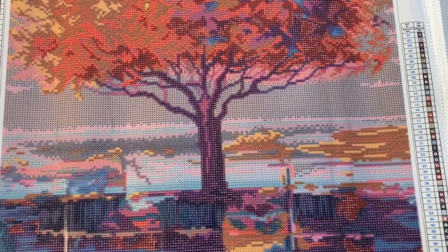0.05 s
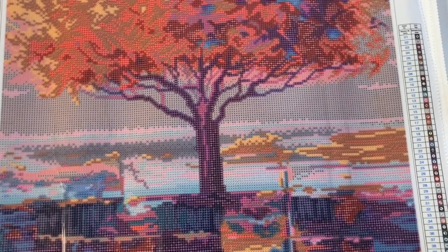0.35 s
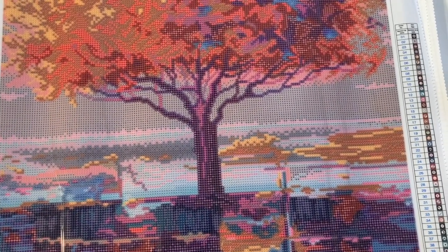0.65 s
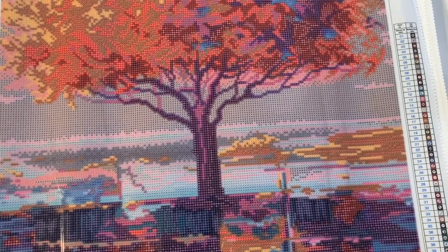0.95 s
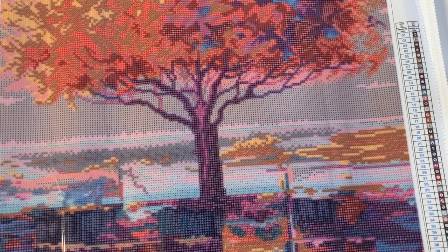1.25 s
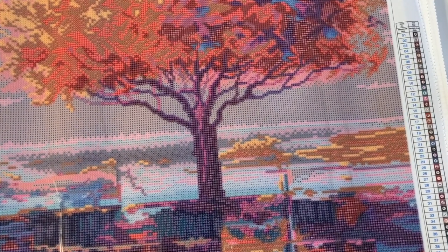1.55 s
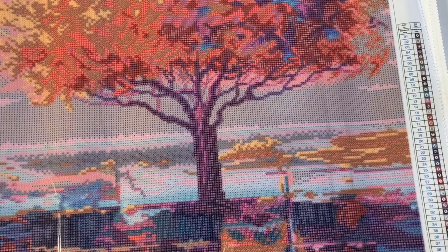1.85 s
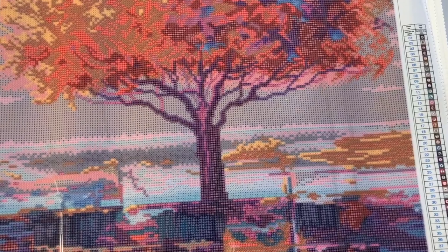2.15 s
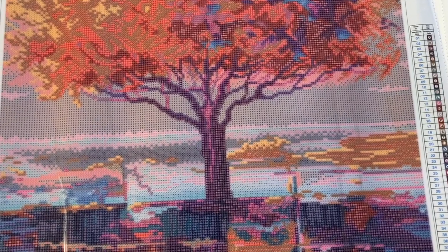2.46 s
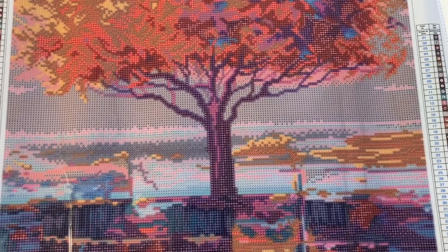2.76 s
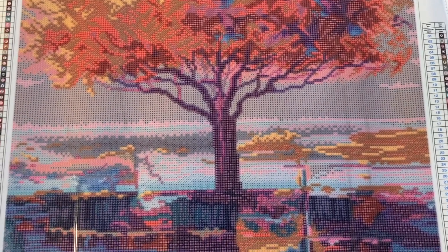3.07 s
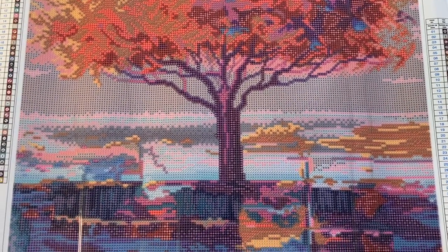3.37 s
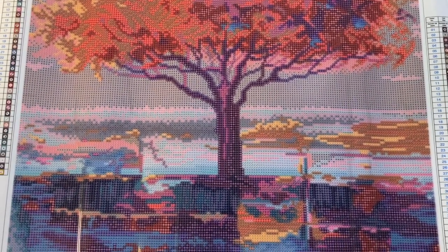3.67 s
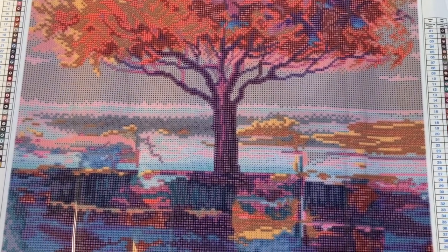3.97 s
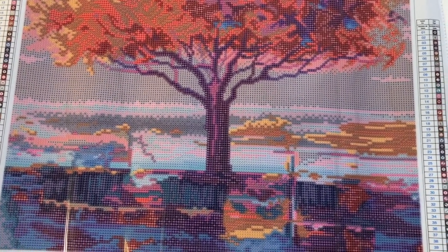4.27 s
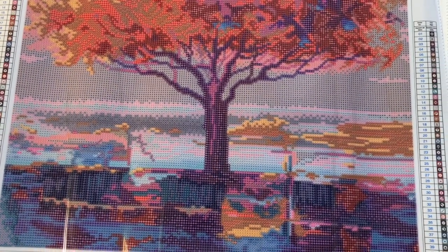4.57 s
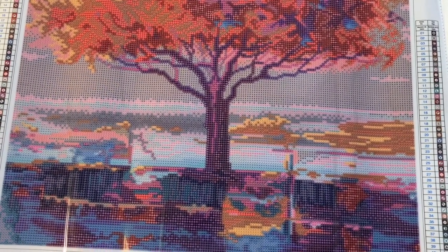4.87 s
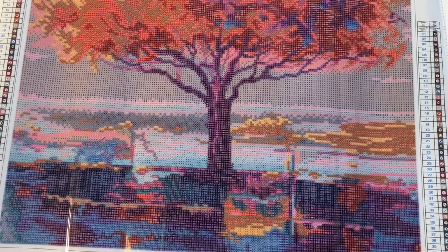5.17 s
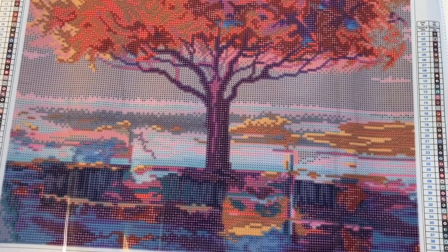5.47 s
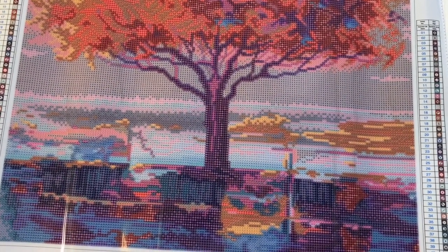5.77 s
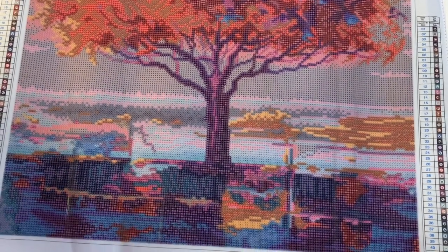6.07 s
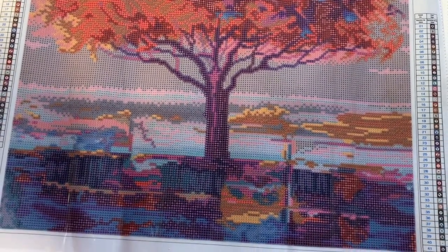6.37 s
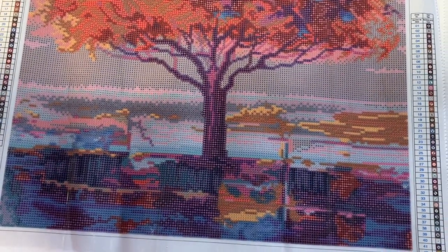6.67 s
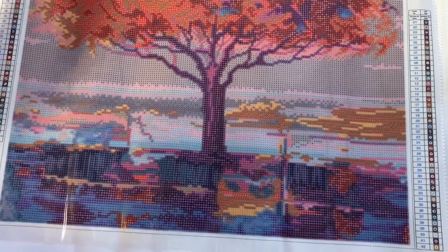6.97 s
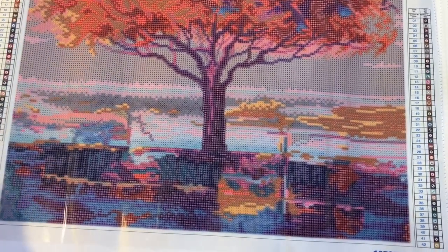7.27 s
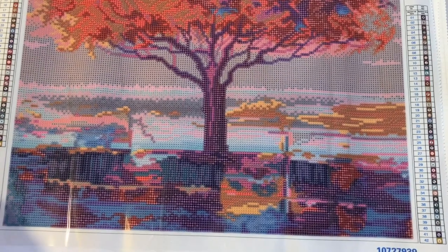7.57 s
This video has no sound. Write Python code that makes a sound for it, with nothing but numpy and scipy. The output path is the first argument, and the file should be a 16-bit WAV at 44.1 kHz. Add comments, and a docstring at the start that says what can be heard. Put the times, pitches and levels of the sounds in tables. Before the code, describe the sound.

In a small room with a faint machine hum, a stiff canvas covered in plastic film is handled right by a stereo microphone. The film crackles in irregular bursts, bright clicks jumping left and right over light pops of the bending sheet. After its busiest stretch the crinkling gives way to gentle sliding swishes and soft thuds on the table, and dies down to sparse ticks.

```python
"""Clear plastic film crackles on a canvas being shifted about a table, close to a small stereo microphone.
Creases at both edges snap singly and in dense swarms, while the stiff sheet flexes and flaps under them.
Towards the end it slides with a softer swish, and the hands bump the table now and then.
A machine hums in the small room."""
import sys
import numpy as np
from scipy import signal
from scipy.fft import rfft, irfft, next_fast_len
from scipy.io import wavfile
from scipy.ndimage import map_coordinates

SR = 44100
rng = np.random.default_rng(int(sys.argv[2]) if len(sys.argv) > 2 else 0)


def inscribe(sig):
    """Save sig as 16-bit PCM at rate SR to the path in sys.argv[1].

    A 1-D sig is mono; a 2-D sig holds one channel per row.
    Samples are clipped to [-1, 1] before scaling.
    """
    pcm = np.round(np.clip(np.atleast_2d(sig).T, -1, 1) * 32767)
    wavfile.write(sys.argv[1], SR, pcm.astype(np.int16))


N = 340452
TIME = np.arange(N) / SR
# how early the left microphone hears the right edge, the left edge and the sliding patch
RIGHT_MS, LEFT_MS, SLIDE_MS = -.272, .265, .41
# bright tone of tiny creases: (frequency [Hz], level [dB])
CREASE_TONE = [(150, -24), (400, -25), (800, -13.5), (1400, -6.5), (2200, -2.5), (3000, -3), (4000, -5),
               (5300, -4), (7200, 5.5), (8400, 3.5), (10300, -3), (12700, 2.5), (15500, -12.5)]


def film(right_db=1.33, left_db=0, swish_db=2.0, swish_rough_db=3):
    """The worked film snaps and crackles at both edges when it bends, and swishes when it slides."""
    # featured snaps: (time [s], energy [dB], tilt [dB/octave], length [ms], left microphone lead [ms])
    single_snaps = [(0.0157, -12.5, 4.5, 0.51, -0.29), (0.0301, -9, 8, 0.51, -0.42),
                    (0.0828, -5.5, 6.5, 0.64, -0.3), (0.0929, -3.5, 5, 1.5, -0.27),
                    (0.1316, -17.5, -1, 0.92, -0.32), (0.174, -14, -4, 0.71, -0.27),
                    (0.1949, -10, 4, 0.6, -0.18), (0.2404, -15, 8.5, 0.77, -0.2),
                    (0.2501, -15.5, 3.5, 0.65, -0.25), (0.3129, -26, -3, 0.94, -0.34),
                    (0.3352, -18, -1.5, 0.84, -0.27), (0.3839, -19.5, -5, 0.7, 0.3),
                    (0.4203, -9, 8, 0.6, -0.22), (0.4311, -10, 0.5, 0.78, -0.31),
                    (0.4464, -12.5, -1, 0.65, -0.15), (0.5008, -13.5, 3, 0.51, -0.21),
                    (0.5201, -6, 7, 0.64, -0.18), (0.5271, -8, 1, 1.1, -0.29),
                    (0.5336, -6.5, 5, 0.88, -0.24), (0.5422, -13.5, 0, 0.51, -0.3),
                    (0.5473, -9.5, -6, 1.01, -0.27), (0.6042, -3.5, 1, 0.63, -0.28),
                    (0.6072, -8, 4, 0.72, -0.33), (0.6135, -7, 2, 0.69, -0.27),
                    (0.6166, -0.5, 9, 1.24, -0.12), (0.6305, -0.5, 5, 0.9, -0.19),
                    (0.6389, -3, -1.5, 1.07, -0.27), (0.6494, -1.5, -1, 0.97, -0.14),
                    (0.6539, -6.5, -8.5, 1.16, -0.32), (0.6644, -2.5, -3.5, 1.2, -0.33),
                    (0.6666, -5, -2, 0.9, -0.24), (0.6755, -6, -4, 1.2, -0.27),
                    (0.7851, -10, -2, 0.91, 0.27), (0.8363, -13, -0.5, 1.04, -0.28),
                    (0.879, -17.5, 1, 0.63, -0.27), (0.9209, -21.5, 7, 0.85, -0.13),
                    (0.9911, -24.5, 8, 0.82, -0.37), (1.0605, -21, -4.5, 2.9, -0.28),
                    (1.1257, -13.5, 3.5, 0.51, -0.25), (1.137, -25.5, 0.5, 0.7, -0.12),
                    (1.1753, -20, -2.5, 0.97, -0.23), (1.218, -21, 1, 0.55, -0.13),
                    (1.233, -16, -1, 0.75, -0.2), (1.254, -17.5, 4, 0.7, -0.27),
                    (1.293, -19, -2, 0.79, -0.036), (1.3071, -13.5, 0.5, 1.3, -0.27),
                    (1.3665, -12.5, -5.5, 1.68, 0.36), (1.3771, -15, 8, 1.33, -0.24),
                    (1.4852, -25.5, 6, 0.67, -0.34), (1.6441, -19.5, 5.5, 0.62, -0.15),
                    (1.7635, -10, -0.5, 0.98, -0.31), (1.7866, -11, -1, 2.34, -0.25),
                    (1.8522, -15, 0, 0.99, -0.29), (1.8955, -19.5, 9.5, 0.6, -0.22),
                    (1.9062, -13, -2, 0.79, -0.3), (1.9439, -25, -3.5, 0.42, -0.27),
                    (1.9659, -24.5, 4, 0.6, -0.11), (1.9952, -11, 3, 0.52, -0.27),
                    (2.0039, -10.5, 1.5, 0.62, -0.14), (2.0708, -17, 2, 0.7, -0.25),
                    (2.0891, -23.5, -1.0, 0.82, -0.13), (2.0957, -19, -2, 0.81, -0.27),
                    (2.1096, -20.5, -5.5, 0.54, -0.16), (2.1754, -13, 0.5, 0.79, -0.27),
                    (2.1812, -19, -8, 0.75, -0.42), (2.19, -12.5, 1, 1.4, -0.048),
                    (2.2186, -2.5, -4, 1.4, -0.26), (2.2228, -7, 1.5, 0.68, -0.29),
                    (2.2448, -1, -2.5, 1.07, 0.27), (2.2463, -2.5, -2.5, 1.3, 0.3),
                    (2.3012, -10.5, -1, 0.57, -0.27), (2.3982, -11.5, 4, 0.87, -0.27),
                    (2.4169, -28, 5.5, 0.45, -0.31), (2.4232, -17, -3.5, 0.62, 0.28),
                    (2.4369, -18, -4, 1.08, -0.27), (2.4412, -16, -1, 1.08, -0.28),
                    (2.4547, -18.5, -2.5, 0.59, -0.28), (2.5196, -12, 13, 1.07, -0.23),
                    (2.5729, -14, -6, 0.76, -0.3), (2.6869, -8, -6, 2.16, 0.27),
                    (2.7507, -12, -1, 1.26, -0.32), (2.7565, -5.5, 12, 0.82, -0.18),
                    (2.7798, -19, 1.0, 0.4, -0.28), (2.7961, -12, -3.5, 1.3, -0.16),
                    (2.8061, -4, 0.5, 0.48, -0.27), (2.829, -14.5, 6, 1.04, -0.36),
                    (2.9386, -23.5, -4, 0.93, -0.18), (2.9465, -15.5, -2, 1.13, -0.074),
                    (3.016, -14.5, -1, 0.74, -0.3), (3.0425, -15, 3.0, 0.6, -0.2),
                    (3.0865, -5.5, 2.5, 0.91, -0.29), (3.1927, -17, -5.5, 1.2, 0.21),
                    (3.243, -20.5, -8, 0.82, -0.26), (3.2714, -15.5, -2, 0.85, -0.14),
                    (3.2863, -12, 0, 0.4, -0.26), (3.2963, -11, 5.5, 0.42, -0.18),
                    (3.2993, -4, 5.5, 0.95, -0.27), (3.3193, -20, 5, 0.8, -0.37),
                    (3.3237, -14.5, 0, 0.55, -0.31), (3.3273, -9, 4, 0.69, -0.31),
                    (3.3815, -14, 0, 0.76, -0.23), (3.3912, -9.5, -1, 0.6, -0.23),
                    (3.4129, -8.5, -1, 1.6, -0.25), (3.4577, -14, 8, 1.1, -0.19),
                    (3.4828, -16.5, -6, 0.91, -0.26), (3.569, -25, -5.5, 0.69, 0.24),
                    (3.5903, -8.5, 1.5, 0.5, -0.27), (3.5972, -18, 1.0, 0.67, -0.3),
                    (3.6098, -28, 8.5, 0.6, -0.34), (3.6265, -25.5, 5, 0.83, -0.3),
                    (3.6568, -14.5, -4, 0.56, -0.25), (3.6733, -20, -6, 1.43, -0.18),
                    (3.7244, -13, -5, 1.83, 0.22), (3.7549, -11.5, -5, 0.75, -0.27),
                    (3.8108, -12.5, -1, 0.87, 0.25), (3.9347, -10.5, -4.5, 1.4, -0.29),
                    (3.9616, -12.5, 0.5, 1.1, -0.28), (4.0098, -12.5, 2, 1.08, -0.27),
                    (4.0445, -10.5, -2.5, 0.59, 0.26), (4.0498, -8.5, 1, 0.6, 0.27),
                    (4.079, -9, 5, 0.51, -0.16), (4.0971, -9, 3.5, 0.64, -0.27),
                    (4.1078, -4, -1, 0.68, -0.26), (4.1168, -10, 1, 0.45, -0.13),
                    (4.1355, -15, 8, 0.5, -0.31), (4.1638, -10, -4, 0.72, -0.3),
                    (4.1691, -5, 3, 0.63, -0.23), (4.2034, -6, 3, 0.92, -0.27),
                    (4.2376, -17, -11.5, 1.16, -0.2), (4.2655, -17.5, -4.5, 0.5, -0.243),
                    (4.2812, -9.5, 2.5, 0.38, -0.3), (4.322, -16.5, -6.5, 0.9, -0.32),
                    (4.3478, -15, 1.5, 0.73, -0.27), (4.3737, -10.0, 1, 1.4, -0.21),
                    (4.388, -11.0, 4, 0.73, -0.16), (4.4138, -12, 1, 0.68, -0.25),
                    (4.4199, -11, -5, 0.63, -0.3), (4.4396, -2.5, 0.5, 0.44, -0.18),
                    (4.4635, -5, -3, 1.9, 0.26), (4.5105, -7.5, -4.5, 1.1, -0.26),
                    (4.5157, -13, -2, 0.65, -0.36), (4.536, -14, -2, 1, -0.24),
                    (4.5818, -13.5, 7, 0.46, -0.16), (4.6875, -13.0, 7, 1.24, -0.099),
                    (4.7463, -13.5, 0, 1.01, -0.29), (4.7719, -10.5, 0, 0.54, -0.31),
                    (4.775, -6.5, -1, 0.44, -0.21), (4.8121, -6.5, -1, 0.84, -0.25),
                    (4.8373, -8, -2, 1.05, -0.27), (4.8563, -8, -4, 0.62, -0.24),
                    (4.9195, -16, 1, 0.58, -0.17), (4.925, -10, 0.5, 1.03, -0.31),
                    (4.93, -9.5, 2.0, 0.65, -0.25), (4.9729, -8.5, 1, 0.53, -0.27),
                    (5.0132, -14.5, 5.5, 0.39, -0.3), (5.0222, -4, -2, 0.94, -0.29),
                    (5.0466, -18, 2, 0.6, -0.31), (5.07, -12.5, -6, 0.83, -0.27),
                    (5.0758, -14, -1.5, 0.65, -0.26), (5.1081, -9, 5.0, 0.49, -0.13),
                    (5.1231, -17, -6, 0.31, -0.19), (5.1414, -16, -10, 1.27, -0.22),
                    (5.168, -4.5, -1.0, 0.78, -0.25), (5.1741, -13, -5, 1.01, -0.28),
                    (5.2138, -9, -5, 0.67, 0.17), (5.2253, -5.5, -1, 0.93, -0.27),
                    (5.3936, -18.5, -5, 2.33, 0.37), (5.4123, -15.5, 4.5, 0.58, -0.32),
                    (5.4407, -30.5, 0, 0.76, -0.18), (5.4636, -23.5, -5.5, 0.87, -0.14),
                    (5.5639, -15.5, -3, 1, -0.33), (5.6045, -11, 0, 0.85, -0.34),
                    (5.7276, -20.5, -3.5, 1.02, 0.47), (5.8558, -18.5, -2.0, 1.22, 0.44),
                    (5.9329, -18, -1.5, 0.97, -0.47), (6.1011, -29, -1.5, 0.98, -0.27),
                    (6.1253, -29.5, 3.5, 0.52, -0.25), (6.1799, -26, -6, 1.45, -0.32),
                    (6.2051, -19.5, -4.5, 1.7, 0.47), (6.28, -27, -10, 1.27, 0.4),
                    (6.4011, -19.5, -8, 1.32, -0.34), (6.424, -22.0, -13, 1.42, 0.49),
                    (6.457, -23, -3, 1.33, 0.39), (6.5325, -11, 2, 2.8, 0.51),
                    (6.541, -12, -1.5, 1.18, 0.43), (6.6443, -9, -1, 0.84, 0.38),
                    (6.924, -29.5, -6.5, 1.55, 0.33), (7.0247, -35, -4.5, 1.2, 0.44),
                    (7.134, -40, -2, 0.91, 0.26), (7.2663, -21.5, -2.5, 0.85, 0.26),
                    (7.532, -35, 2, 0.56, -0.27), (7.6453, -25.5, 3, 0.46, -0.27),
                    (7.6665, -29.5, -3.5, 0.83, -0.18)]
    # blend from bending to sliding: (time [s], sliding share [0-1])
    sliding = [(0, 0.07), (5.25, 0.03), (5.4, 0.35), (5.65, 0.77), (6.1, .4), (6.6, 0.43), (6.9, 0.5),
               (7.72, 0.24)]
    # blend between the crackling edges: (time [s], left share [0-1])
    left_share = [(0, .15), (.65, .25), (1.2, .1), (1.8, .22), (2.27, .5), (2.45, .25), (2.7, .3),
                  (3.3, .1), (3.8, .38), (4.3, .25), (4.6, .45), (5.25, .45), (6.2, .55), (7.72, .5)]
    # lower crackle around the ring of the taut film on the left: (frequency [Hz], level [dB])
    taut_tone = [(150, -35), (400, -5), (800, -4), (1400, -8.5), (2200, -13.5), (3100, -2), (3850, 2.5),
                 (4700, -2), (5600, -2.5), (7500, -2.5), (10000, -3), (15500, -1.5)]
    # hiss of sliding film: (frequency [Hz], level [dB])
    swish_tone = [(200, -25), (700, -29), (1400, -2), (2200, 0.5), (3000, -2), (4000, -2), (5300, 3.5),
                  (8000, -2.5), (11000, -4), (13500, -3), (15500, -34)]
    work_db = effort(0)
    slide = np.clip(curve(sliding), 0, .99)
    left = np.clip(curve(left_share), .01, .99)
    bend_db = work_db + 10 * np.log10(1 - slide)
    right_edge = crackle(bend_db + right_db + 10 * np.log10(1 - left), CREASE_TONE, RIGHT_MS)
    left_edge = crackle(bend_db + left_db + 10 * np.log10(left), taut_tone, LEFT_MS, tilt_db=1.16)
    swish = np.sqrt(slide) * noise(swish_tone) * amp(work_db + swish_db)
    swish *= unit(amp(swish_rough_db * wobble(120)))
    snapping = snaps(np.vstack([single_snaps, small_snaps(work_db, slide)]))
    return snapping + right_edge + left_edge + placed(swish, SLIDE_MS)


def creases(rows, tone, rise=0.27, size=256, body_hz=5600):
    """Each crease is a short dry click with its own colour."""
    start, energy_db, tilt, length_ms, lead_ms = np.transpose(rows)[:, :, None]
    steps, hz = np.arange(size) - size // 4, np.fft.rfftfreq(size, 1 / SR)
    age = steps * 1000 / SR / np.maximum(length_ms, .1)
    burst = rng.standard_normal(age.shape) * np.exp(-np.maximum(age, -age / rise))
    octaves = np.log2(np.maximum(hz, 1500) / 6000)
    spectrum = rfft(burst) * amp(along(tone, hz) + tilt * octaves)
    spectrum *= amp(energy_db) / np.linalg.norm(irfft(spectrum), axis=1, keepdims=True)
    # the treble leans left or right; the body, below body_hz, leans left
    left = np.where(hz < body_hz, np.sign(lead_ms) * arrival(hz, LEFT_MS), arrival(hz, lead_ms))
    at = np.maximum(np.round(start * SR).astype(int) + steps, 0).ravel()
    return np.array([np.bincount(at, irfft(spectrum * mic).ravel(), N)[:N] for mic in (left, left.conj())])


def snaps(rows, cascade_db=-6, cascade_life_s=0.004):
    """Creases snap dry; the biggest also set off a brief cascade among their neighbours."""
    # tone of one snap: (frequency [Hz], level [dB])
    snap_tone = [(150, -34), (400, -17), (800, -11.5), (1400, -9.5), (2200, 0.5), (3000, -5), (4000, -1),
                 (5300, 0), (7200, 6), (8400, -1), (10300, -1.5), (12700, 2.5), (15500, -3)]
    start, db = rows[:, 0], rows[:, 1]
    cascade_power = dying(start, amp(2 * db + cascade_db) ** 2 / (cascade_life_s * SR), cascade_life_s)
    return creases(rows, snap_tone) + placed(np.sqrt(cascade_power) * noise(CREASE_TONE), RIGHT_MS)


def small_snaps(work_db, slide, per_second=20, typical_db=-19, length_ms=0.94, count=400):
    """Rows of lesser creases that give way at random: louder under strain, rarer while sliding."""
    when, chance, size, colour = rng.random((count, 4)).T
    at = (when * (N - 1)).astype(int)
    size, colour = np.sqrt(3) * (2 * np.array([size, colour]) - 1)  # centred, with unit spread
    db = typical_db + 0.82 * (work_db[at] + 43) + 2 * size
    fires = chance < per_second * TIME[-1] / count * (1 - slide[at]) ** 2
    rows = np.column_stack([at / SR, db, 3.7 * colour, np.full(count, length_ms), np.full(count, RIGHT_MS)])
    return rows[fires]


def crackle(work_db, tone, lead_ms, tilt_db=0, spread_db=4.0, clump_db=3.5, length_ms=0.68, count=12000):
    """Tiny creases swarm in clumps along one edge; harder work sets off more and brighter ones."""
    at, chance = rng.integers(0, N, count), rng.random(count)
    size, colour, jitter = rng.standard_normal((3, count))
    max_rate = count / TIME[-1]
    rate = np.clip(760 * amp(.6 * (work_db[at] + 45)), 200, max_rate)  # creases a second
    clumps = np.minimum(wobble(90)[at], 1.4)
    gain = unit(amp(spread_db * np.minimum(size, 1.5) + clump_db * clumps))
    energy_db = work_db[at] + 20 * np.log10(gain) + 10 * np.log10(SR / rate)
    tilt = tilt_db + 0.05 * np.minimum(work_db[at] + 49.5, 0) + 2 * colour
    rows = np.column_stack([at / SR, energy_db, tilt, np.full(count, length_ms), lead_ms + .0013 * jitter])
    return creases(rows[chance < rate / max_rate], tone)


def canvas(drag_db=-2, rough_db=5.5, puff_db=-7, puff_life_s=0.0041, pop_db=-9, pop_life_s=0.0072):
    """The stiff sheet drags in jerks; a buckle gives a puff and a pop that sinks as the bulge relaxes."""
    # the sheet buckling or patting the table: (time [s], level [dB], bulge pitch [Hz])
    flaps = [(0.462, -33.5, 786), (0.608, -32, 646), (0.649, -28, 966), (0.835, -33.5, 680),
             (1.425, -31, 1037), (1.865, -42, 644.5), (2.217, -23.5, 697), (2.245, -24, 744),
             (2.247, -27.5, 334.6), (2.518, -30, 440), (2.608, -42.5, 630), (3.479, -38, 1060),
             (3.77, -55.5, 758), (4.14, -32.5, 805), (4.346, -35.5, 477), (4.511, -29, 688),
             (4.729, -34.5, 686), (4.928, -28.5, 960), (5.121, -28.5, 764), (5.222, -30, 742),
             (5.603, -36.5, 578), (6.53, -41.5, 357), (6.642, -33.5, 690), (7.185, -46, 467),
             (7.279, -40, 655), (7.299, -43, 640), (7.389, -55, 842), (7.474, -41, 554)]
    # dull body of the canvas: (frequency [Hz], level [dB])
    canvas_tone = [(110, -18), (190, 2), (250, -0.5), (320, -1.5), (430, -3.5), (540, 0), (700, -2.5),
                   (1000, -1), (1350, -2), (2300, -9.5), (6000, -14)]
    starts, levels_db, _ = np.transpose(flaps)
    puffs = dying(starts, amp(levels_db + puff_db), puff_life_s)
    drag = amp(effort(1) + drag_db) * unit(amp(rough_db * np.minimum(wobble(130), 2)))
    pops, t = np.zeros(N + SR), np.arange(SR // 10) / SR
    for start, db, hz in flaps:
        sinking = np.sin(2 * np.pi * hz * t * (1 - 3 * t))
        pops[round(start * SR):][:len(t)] += amp(db + pop_db) * sinking * np.exp(-t / pop_life_s)
    return np.hypot(drag, puffs) * noise(canvas_tone) + pops[:N]


def effort(layer, grip_db_per_s=340, settle_db_per_s=276):
    """Envelope in dB of the film (0) or canvas (1): light strain, plus pushes that grip, hold, settle."""
    # pushes that shift the sheet: (time at full strength [s], hold [s], film [dB], canvas [dB])
    pushes = [(0.0, 0.22, -43.5, -57), (0.071, 0.027, -40.5, -45), (0.47, 0.02, -46, -46),
              (0.533, 0.04, -41, -47), (0.617, 0.059, -34, -37.5), (0.791, 0.057, -40, -50.5),
              (0.959, 0.017, -52, -50.5), (1.183, 0.19, -52.5, -59), (1.347, 0.068, -41, -48.5),
              (1.522, 0.021, -43.5, -52.5), (1.663, 0.054, -46.5, -53.5), (1.771, 0.041, -40, -48.5),
              (1.911, 0.11, -40.5, -49.0), (2.075, 0.064, -50.5, -67.5), (2.252, 0.014, -41.5, -45),
              (2.292, 0.077, -45.5, -50), (2.45, 0.0614, -43.5, -51), (2.52, 0.13, -42, -50),
              (2.685, 0.03, -39, -48.5), (2.777, 0.062, -41.5, -50.5), (3.011, 0.09, -43, -49),
              (3.206, 0.034, -50, -54), (3.29, 0.024, -44, -47), (3.373, 0.057, -42.5, -52),
              (3.602, 0.17, -46.5, -66), (3.797, 0.085, -37.5, -46), (3.94, 0.13, -38.5, -47.5),
              (4.114, 0.039, -36, -46.5), (4.315, 0.1, -45.5, -48.5), (4.458, 0.014, -38, -55),
              (4.515, 0.032, -40, -55.5), (4.592, 0.028, -32.5, -46), (4.675, 0.058, -44, -57.5),
              (4.77, 0.1274, -40.5, -54), (4.925, 0.039, -35, -49.5), (5.0, 0.023, -39.5, -53),
              (5.108, 0.041, -37, -47), (5.222, 0.038, -34, -48.5), (5.466, 0.069, -64, -74),
              (5.608, 0.061, -52.5, -70.5), (5.842, 0.02, -50.0, -60.5), (5.976, 0.033, -52.5, -55.5),
              (6.105, 0.13, -61, -71.5), (6.266, 0.024, -53.5, -53.5), (6.415, 0.051, -50.5, -66),
              (6.548, 0.016, -40, -47), (6.64, 0.017, -40, -43.5), (6.783, 0.043, -51.5, -55),
              (7.03, 0.014, -68.5, -80), (7.142, 0.012, -67.5, -69), (7.176, 0.022, -65.5, -67),
              (7.266, 0.0021, -61, -67.5), (7.284, 0.039, -61, -54), (7.384, 0.0071, -61, -56),
              (7.472, 0.013, -72, -56), (7.657, 0.058, -64, -72.5)]
    # light strain between pushes: (time [s], film [dB], canvas [dB])
    strain = [(0.0, -44.5, -49), (0.28, -60.0, -61), (0.33, -58.0, -72.5), (0.65, -48.0, -44.5),
              (1.03, -66, -64.5), (1.11, -70, -65.5), (1.49, -64.5, -57), (2.7, -50.0, -53),
              (2.83, -53.0, -68), (3.63, -57.0, -60.5), (3.98, -46.0, -57), (4.26, -49.0, -54),
              (5.12, -46.0, -55.5), (5.31, -63, -76), (5.72, -52.0, -72), (6.16, -64.0, -67.5),
              (6.66, -56.0, -53), (6.9, -63, -67.5), (6.99, -82.5, -85), (7.12, -89, -85.5),
              (7.2, -79.5, -77.5), (7.71, -66.5, -64.5)]
    t = TIME[::64]
    times, *strain_db = np.transpose(strain)
    power = amp(np.interp(t, times, strain_db[layer])) ** 2
    for start, hold, *db in pushes:
        before, after = np.maximum(start - t, 0), np.maximum(t - start - hold, 0)
        power += amp(db[layer] - grip_db_per_s * before - settle_db_per_s * after) ** 2
    return np.interp(TIME, t, 10 * np.log10(power))


def sheet_ring(hz):
    """The sheet's resonances ring on top of whatever shakes it."""
    # resonances: (frequency [Hz], width [Hz], level [dB])
    modes = [(310, 28, -8), (449, 27, -4), (646, 20, 1), (754, 12, -5), (813, 29, -1.5), (936, 32, -7.5),
             (1048, 21, 0), (1347, 23, -0.5), (2090, 60, -6), (3870, 140, -12)]
    return 1 + sum(amp(db) * 1j * hz * width / (centre ** 2 - hz ** 2 + 1j * hz * width)
                   for centre, width, db in modes)


def hand_bumps():
    """Hands press the sheet onto the table with low, soft thuds."""
    # thuds: (time [s], level [dB], half-width [s])
    bumps = [(0.624, -58, 0.051), (0.76, -52, 0.0099), (6.263, -46.5, 0.049), (6.434, -53.5, 0.053),
             (6.656, -53, 0.034)]
    # boom of the table: (frequency [Hz], level [dB])
    table_tone = [(50, -32), (100, 5.5), (140, 0.5), (220, -6), (400, -16.5), (1000, -56)]
    return noise(table_tone) * sum(amp(db) * np.exp(-((TIME - s) / width) ** 2) for s, db, width in bumps)


def room(x, size=256):
    """Each spot of the sheet has its own echo paths, so the room returns a diffuse, dying wash."""
    # reverb decay: (frequency [Hz], time to fall 60 dB [s])
    decay = [(200, 0.14), (1000, 0.19), (4000, 0.24), (8000, 0.23), (16000, 0.05)]
    # reverb colour: (frequency [Hz], level [dB])
    room_tone = [(200, 1), (700, -3), (2000, -1), (4000, -1), (6000, -3.5), (7500, -8), (10000, -13),
                 (15000, -10)]
    hop = size // 4
    grid = dict(fs=SR, nperseg=size, noverlap=size - hop)
    hz, _, bands = signal.stft(np.pad(x, ((0, 0), (size, 0)))[:, :N], **grid)
    power = np.mean(np.abs(bands) ** 2, axis=0)
    feedback = amp(-60 * hop / SR / along(decay, hz)) ** 2
    stored = np.array([signal.lfilter([1 - k], [1, -k], band) for k, band in zip(feedback, power)])
    wash = signal.stft(rng.standard_normal((2, N)), **grid)[2]
    wash *= np.sqrt(stored) * amp(along(room_tone, hz))[:, None] / np.std(wash)
    return signal.istft(wash, **grid)[1][:, :N]


def machine_hum():
    """A machine hums a little to the right, slightly unsteady in level and phase."""
    # hum partials: (frequency [Hz], level [dB])
    partials = [(35, -66.5), (70, -55.5), (104.9, -55.5), (120, -60.5)]
    waver_db, drift = 2.26 * wobble(3.124), 0.1 * wobble(2.28)
    hum = sum(amp(db + waver_db) * np.sqrt(2) * np.sin(2 * np.pi * (hz * TIME + rng.random()) + drift)
              for hz, db in partials)
    return hum * amp([[-2.4], [1.8]])


def room_rumble(level_db=-54.0, width_db=-7):
    """The room's low rumble, mostly common to both microphones."""
    # rumble colour: (frequency [Hz], level [dB])
    air_tone = [(20, -28), (40, -18), (55, 0), (85, 1), (125, -2.5), (170, -5.5), (250, -19), (400, -29.5),
                (1000, -54), (3000, -42), (8000, -75), (16000, -84.5)]
    air = noise(air_tone) + amp(width_db) * np.array([noise(air_tone), noise(air_tone)])
    return amp(level_db) * air * amp([[-.6], [.6]])


def amp(db):
    """Decibels to gain."""
    return 10 ** (np.asarray(db) / 20)


def unit(x):
    """Scale to rms 1."""
    return x / np.sqrt(np.mean(x ** 2) + 1e-20)


def along(points, hz):
    """Read (frequency, value) points on a log axis."""
    knots_hz, values = np.transpose(points)
    return np.interp(np.log(hz + 1), np.log(knots_hz + 1), values)


def curve(rows):
    """One value per sample from (time, value) rows."""
    return np.interp(TIME, *np.transpose(rows))


def wobble(rate):
    """A smooth random curve, rate knots a second."""
    coarse = np.linspace(0, TIME[-1], int(TIME[-1] * rate * 4) + 2)
    knots = rng.standard_normal(int(N * rate / SR) + 4)
    return np.interp(TIME, coarse, map_coordinates(knots, [coarse * rate]))


def dying(times, sizes, life_s):
    """An envelope that jumps at each time and dies away."""
    kicks = np.bincount(np.round(times * SR).astype(int), sizes, N)[:N]
    return signal.lfilter([1], [1, -np.exp(-1 / (life_s * SR))], kicks)


def noise(tone):
    """Coloured noise of rms 1."""
    size = next_fast_len(N)
    hz = np.fft.rfftfreq(size, 1 / SR)
    white = rng.standard_normal(len(hz)) + 1j * rng.standard_normal(len(hz))
    return unit(irfft(amp(along(tone, hz)) * white, size)[:N])


def filtered(x, response):
    """Pass x through a complex frequency response."""
    size = next_fast_len(N + SR // 2)
    return irfft(rfft(x, size) * response(np.fft.rfftfreq(size, 1 / SR)), size)[..., :N]


def arrival(hz, lead_ms):
    """Phase turn that advances one microphone by half of lead_ms."""
    return np.exp(1j * np.pi * hz * lead_ms / 1000)


def placed(x, lead_ms):
    """A sound that reaches the left microphone lead_ms before the right one."""
    return filtered(x, lambda hz: np.array([arrival(hz, lead_ms), arrival(hz, -lead_ms)]))


def scene(room_db=-0.9):
    """The sheet's edges lie on either side of the microphones; the canvas flexes on the left."""
    # stereo lean: (frequency [Hz], left over right [dB])
    balance = [(100, -2), (250, 0), (600, 6), (1100, 3.5), (2200, 3), (4000, 1), (5500, 2), (7500, 0),
               (15000, 0)]
    direct = filtered(film() + placed(canvas(), LEFT_MS), sheet_ring) + hand_bumps()
    in_room = direct + amp(room_db) * room(direct)
    sides = np.array([[.5], [-.5]])
    return filtered(in_room, lambda hz: amp(sides * along(balance, hz))) + machine_hum() + room_rumble()


def record(dry, top_hz=15850):
    """A steep low-pass takes off the very top."""
    return filtered(dry, lambda hz: 1 / (1 + (hz / top_hz) ** 160))


dry = scene()
out = record(dry)
inscribe(out)
```